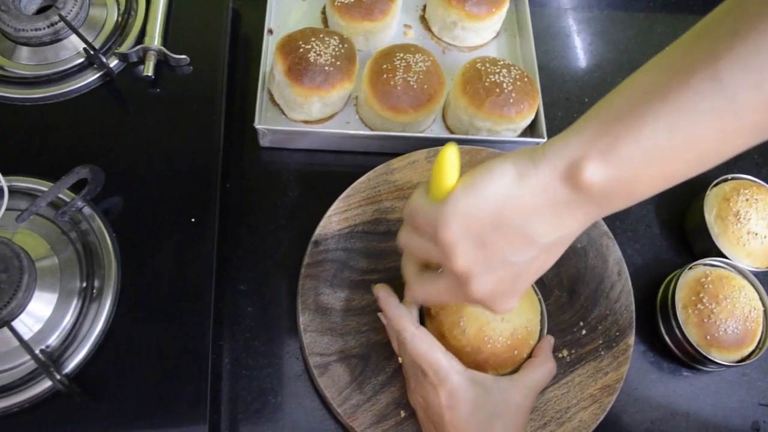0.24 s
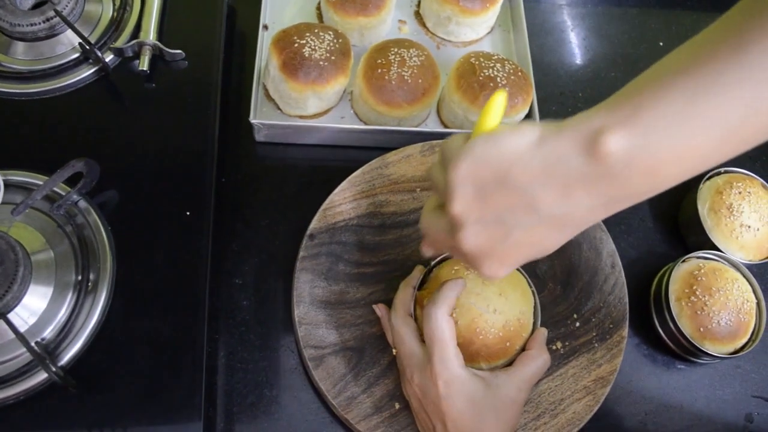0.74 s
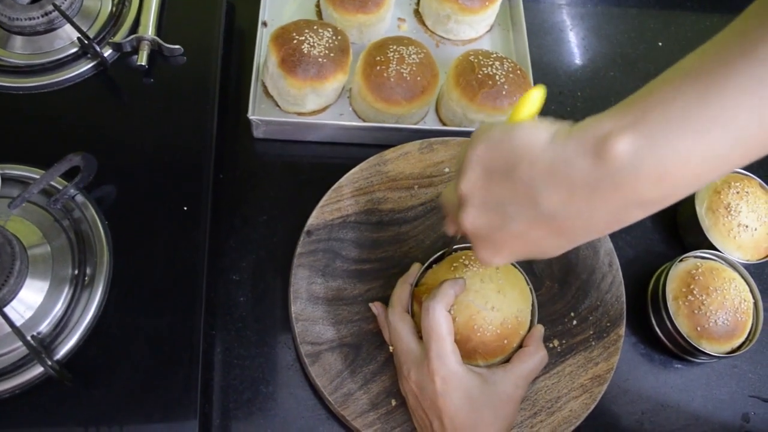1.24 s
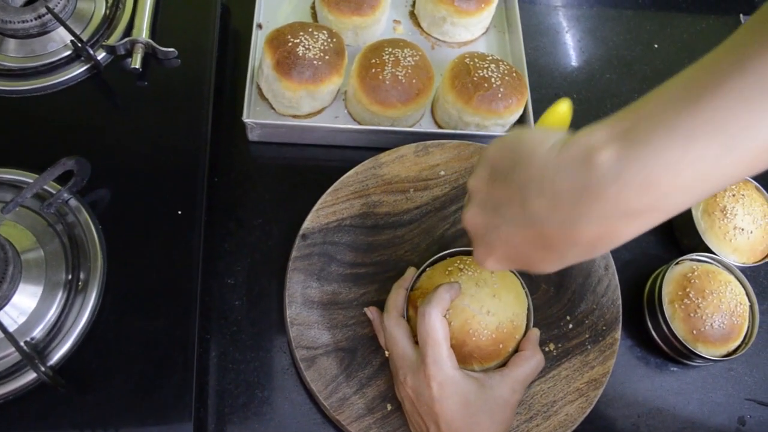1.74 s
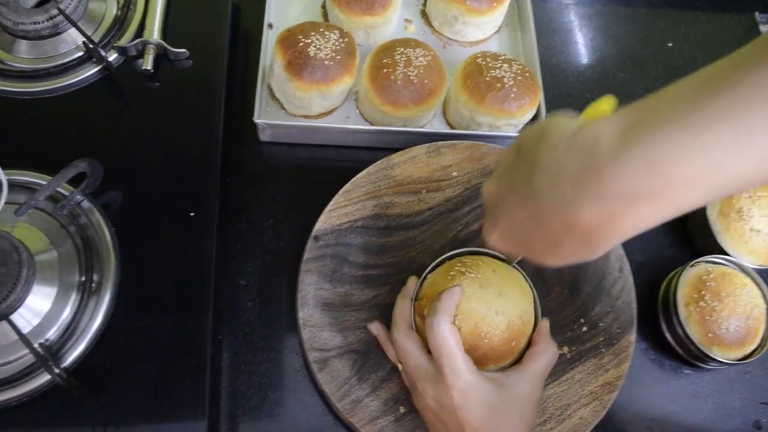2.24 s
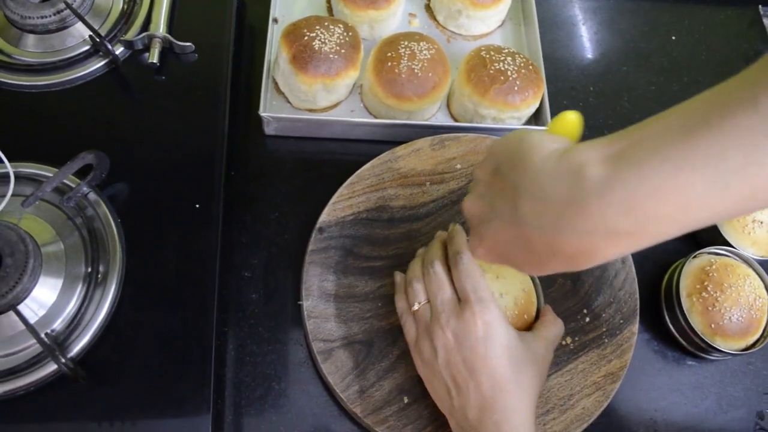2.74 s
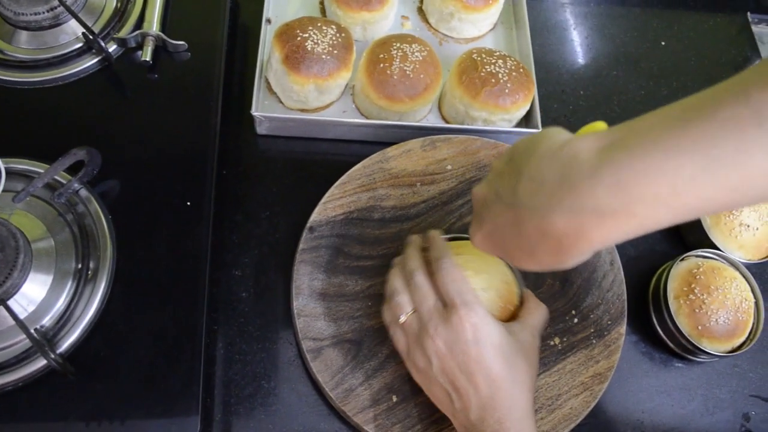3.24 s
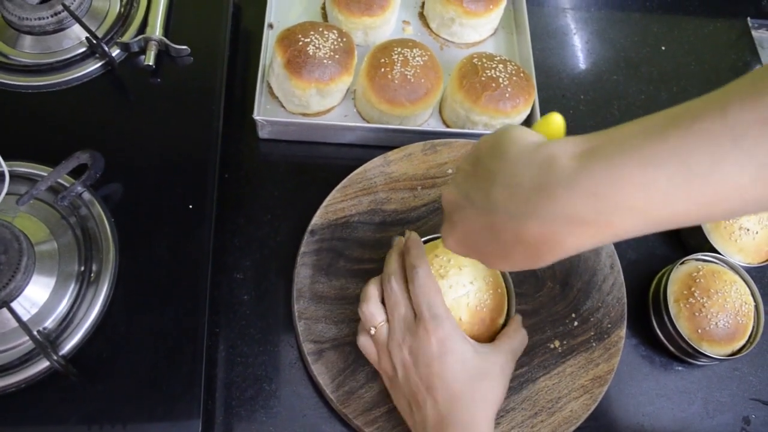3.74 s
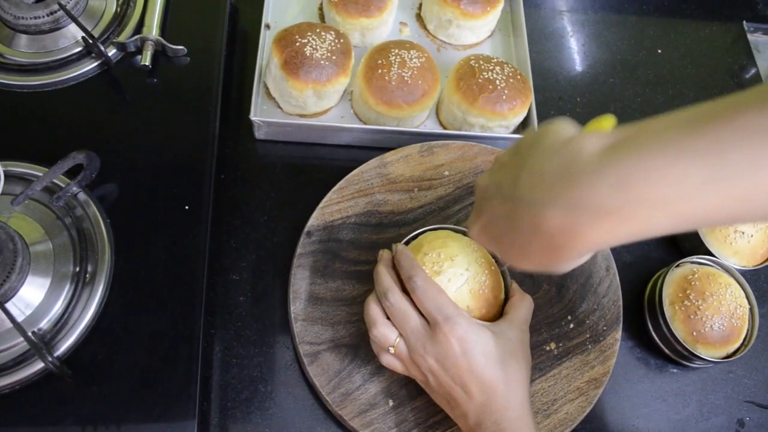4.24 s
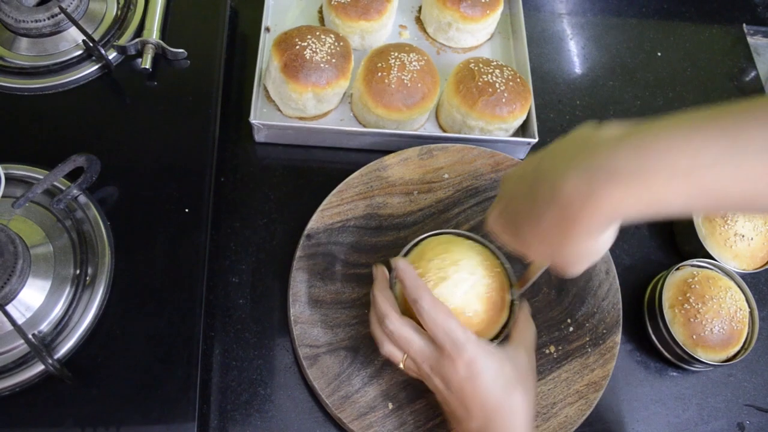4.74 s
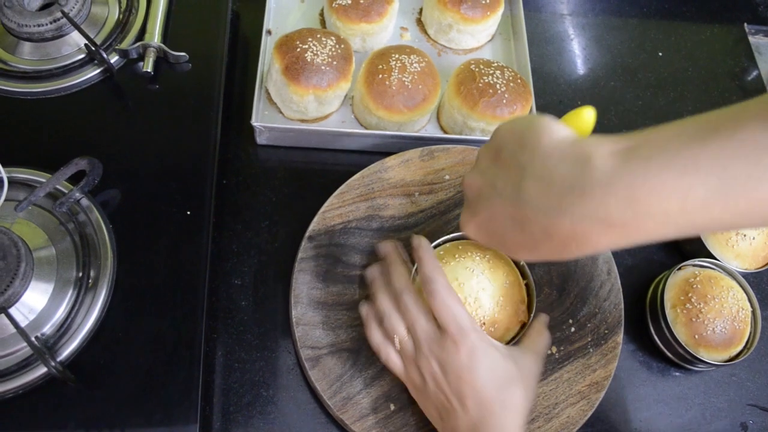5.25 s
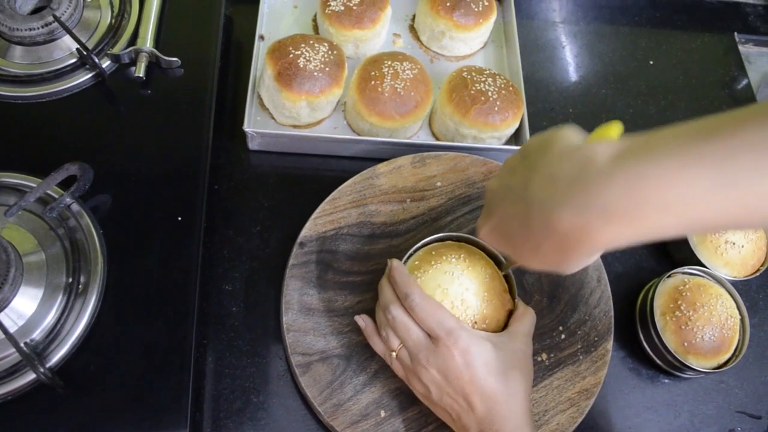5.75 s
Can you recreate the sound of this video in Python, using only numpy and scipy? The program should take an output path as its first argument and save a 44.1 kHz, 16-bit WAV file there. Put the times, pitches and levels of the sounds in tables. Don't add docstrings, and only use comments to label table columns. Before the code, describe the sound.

Small metal tin worked with a knife: soft scratchy sawing first, uneven and quickening into firmer knocks, a short lull, then abrupt scraping stabs each stopped by a bright, hollow tin-and-wood knock. Recorded near the action in a hard, live kitchen with a short ring and quiet low background noise; the top treble is cut off.

```python
import sys
import numpy as np
from scipy import signal
from scipy.fft import rfft, irfft, next_fast_len
from scipy.io import wavfile
from scipy.ndimage import uniform_filter1d, map_coordinates

SR = 44100
rng = np.random.default_rng(int(sys.argv[2]) if len(sys.argv) > 2 else 0)


def unload_audio(sound):
    columns = np.transpose(np.atleast_2d(sound))
    steps = np.round(np.clip(columns, -1, 1) * 32767)
    wavfile.write(sys.argv[1], SR, steps.astype(np.int16))


def gain_from_db(level_db):
    decades = np.asarray(level_db, float) / 20
    return 10 ** decades


N = 264159

# start in seconds, peak in dB, upper resonance in dB, steel clink in dB.
KNOCKS = [(0.25, -68, 14, -15), (0.372, -66, 14, -20), (0.399, -65, 17, -20), (0.836, -35, 2.5, -1),
          (1.139, -42, 1.5, -31), (1.121, -46, -4, -27), (1.159, -35.5, -10, -22), (1.166, -41.5, -5, -22),
          (1.178, -45, 5, -21), (1.316, -53, -7, -15.5), (1.426, -53, -17, -16), (1.449, -44, -2, -31),
          (1.457, -39, -10, -22), (1.474, -47.5, -7, -28), (1.488, -23.5, -3.5, -19.5),
          (1.494, -36, -3.5, -18), (1.741, -45, 5, -35), (1.727, -58, 10, -32), (1.751, -45.5, 14, -30),
          (1.759, -39, 2.5, -36), (1.768, -37, -0.5, -32), (1.786, -33, 3, -8.5), (1.803, -46.5, 13.5, -14),
          (1.81, -42, 8, -13), (1.827, -49, -5, -14), (1.858, -75, -6, -13), (2.052, -57.5, 16.5, -21),
          (2.074, -49, 12.5, -27), (2.087, -44, 12, -26), (2.102, -30, -5, -32), (2.115, -26.5, -18, -30),
          (2.1305, -33, 1, -13), (2.124, -21, -6, -16.5), (2.413, -50.5, 3, -33), (2.423, -57, 13, -33),
          (2.436, -58.5, 13.5, -23), (2.458, -48, -5.5, -30), (3.168, -50, 4.5, -26.5),
          (3.2, -37, 0.5, -20), (3.2283, -10.5, -1, -8), (3.448, -44.5, -6.5, -10.5),
          (3.517, -16.5, -2.5, -14.5), (4.0475, -20, 1, -15), (4.286, -55.5, 4, -15), (4.305, -55, 3, -14),
          (4.354, -18, -1, -7.5), (4.658, -18.5, -3.5, -14.5), (4.801, -57.5, 6, -10),
          (5.645, -48, 11.5, -27.5), (5.654, -47, 7.5, -42), (5.745, -63, 8, -8), (5.882, -48.5, -18, -23),
          (5.929, -27, 0, -9), (5.969, -57, -11, -12)]
# start in seconds, then rim clang, room boom, blade tick and
# worktop thud, all in dB.
LANDINGS = [
    (0.837, -47, -69, -54.5, -47),
    (1.488, -54, -69, -68, -72),
    (2.124, -61, -63.5, -62.5, -37.5),
    (3.2271, -27, -56, -46.5, -35.5),
    (3.5159, -39.5, -63, -46, -47.5),
    (4.046, -65, -69, -55, -49),
    (4.352, -48, -62, -59, -45.5),
    (4.656, -40.5, -57.5, -78, -72),
    (5.6409, -64, -81, -75, -48.5),
    (5.9296, -40.5, -54.5, -48, -34.5),
]
# time in seconds, share from 0 to 1.
CUSHION = [(0, 0.97), (2.6, 0.97), (3.1, 0.7), (3.4, 0.7), (3.49, 0.8), (4.05, 0.75), (4.35, 0.28),
           (4.66, 0.54), (5.9, 1)]
# centre in Hz, width in Hz, level in dB.
HOLLOW = [(555.7, 50, -12), (698.5, 43, -0.5), (734, 83, 2), (1040, 87, -13)]
# centre in Hz, width in Hz, level in dB.
UPPER = [(1094, 70, -15.5), (1248, 110, 0.5), (1335, 170, -4.5), (1460, 80, -9.5)]
# centre in Hz, width in Hz, level in dB.
STEEL = [(1630, 120, 2), (1760, 130, 2.5), (1830, 70, -2.5), (2030, 110, -9)]
# centre in Hz, width in Hz, level in dB.
WORKTOP = [(300, 49, 1.2), (370, 180, 9.5), (500, 170, 9.7)]
# frequency in Hz, level in dB per Hz.
EDGE = [(5500, -42), (7000, -8), (8000, 4), (9000, 2.5), (10300, 8), (11200, 0.5), (12200, -1.5),
        (13500, -17), (15500, -33.5), (16000, -63)]
# frequency in Hz, level in dB per Hz.
FLANK = [(3000, -48.5), (4200, 0), (5000, -4.5), (6000, -5.5), (7000, -6), (8500, -23)]


def knocks():
    s, db, upper_db, steel_db = np.transpose(KNOCKS)
    land, _, _, land_tick_db, land_thud_db = np.transpose(LANDINGS)
    start = s - .0017
    both = np.r_[s, land]

    soft = np.clip(curves(CUSHION)[0], 0, 1)
    low = blows(start, db + 38, chatter=.03, t60=.012)
    low = soft * filtered(low, body([(715, 180, 1.5)], 110, 6700)) + (1 - soft) * low
    high = blows(start, db + upper_db + 38, chatter=.03, t60=.012)
    cushioned = filtered(high, body([(1294, 140, 3.53)], 100, 5000))
    bare = filtered(high, body([(1350, 1200, 0.92)], 100, 5000))
    high = soft * cushioned + (1 - soft) * bare
    tin = -filtered(low, body(HOLLOW, 450, 1050)) - filtered(high, body(UPPER, 800, 1600))

    clink = blows(start, db + steel_db + 24, chatter=0.33, t60=0.031)
    tin += filtered(clink, body(STEEL, 1200, 2300))

    thud_db = np.r_[-56 + 0.16 * db, land_thud_db]
    thud = blows(both, thud_db + 22.5, chatter=0.11, t60=0.087)
    tin += filtered(thud, body(WORKTOP, 310, 510))
    tick_db = np.r_[-65.5 + 0.22 * db, land_tick_db]
    tick = bursts(np.transpose([both, tick_db, 0.013 + 0 * both]))
    return tin + shaped(tick, EDGE) + gain_from_db(11.0) * shaped(tick, FLANK)


# centre in Hz, width in Hz, level in dB.
RIM = [(2166, 200, 1.5), (2220, 210, 4), (2605, 93, -9), (2700, 120, -8), (3070, 58, -9)]


def landings():
    s, rim_db, boom_db, tick_db, _ = np.transpose(LANDINGS)

    def rim_response(f):
        steep = 1 / (1 - (f / 3050) ** 2 + .5j * f / 3050) ** 4
        return steep * (.15 + .85 / (1 + (f / 3130) ** 30)) * body(RIM, 1900, 3600)(f)

    def room_mode(f):
        return body([(122, 12, 0)], 60, 300)(f) ** 2

    rattle = bursts(np.transpose([s, rim_db - 29.0, 0.35 + 0 * s]))
    clang = blows(s + .0006, rim_db - 0.5, chatter=0.39, t60=0.01)
    rim = filtered(clang + rattle, rim_response)
    sizzle = bursts(np.transpose([s, rim_db - 28, 0.37 + 0 * s]))
    rim += shaped(sizzle, [(2900, -28.0), (3500, 2.5), (5200, 3.5), (7500, -24.0)])
    slap = bursts(np.transpose([s, tick_db - 7.0, 0.22 + 0 * s]))
    rim += shaped(slap, FLANK)
    rim += gain_from_db(7.5) * filtered(rattle, body([(1520, 200, 6), (1750, 200, 4)], 1100, 2300))
    boom = blows(s + 0.0044, boom_db + 61.0, chatter=.01, t60=.01)
    return rim + filtered(boom, room_mode)


# start in seconds, length in seconds, level at the end in dB,
# upper resonance in dB, swell in dB.
DRAG = [(0.01, 0.12, -61.5, 11, 8), (0.145, 0.074, -73, 9.5, 6), (0.221, 0.18, -66, 14, 4.5),
        (0.732, 0.092, -51, 2, 40), (1.06, 0.096, -43.5, 1.5, 35), (1.327, 0.019, -59, -7, 2),
        (1.389, 0.08, -45.5, 4.5, 33), (1.608, 0.15, -64, -1, 14), (1.7, 0.055, -47.5, 8, 26),
        (1.759, 0.032, -41.5, -3, -0.5), (1.952, 0.066, -61, 5, 4), (2.019, 0.091, -35.5, -1, 36.5),
        (2.42, 0.018, -68.5, 13.5, 20), (2.477, 0.011, -63, -18, -5), (3.163, 0.056, -36.5, 0, 22),
        (3.475, 0.055, -54.5, 7.5, 8.5), (3.989, 0.1, -46, -0.5, 17.5), (4.273, 0.072, -40.5, 0.5, 26),
        (4.555, 0.13, -40.5, 2.5, 26), (5.537, 0.044, -64, 6, 8), (5.631, 0.0089, -50, 3.5, 6),
        (5.763, 0.021, -81.5, 18, -7), (5.865, 0.051, -47.5, 6.5, 27)]


def drag():
    s, length, db, upper_db, swell_db = np.transpose(DRAG)
    off_db_per_s = 695.5
    low = strokes(s, length, db - 0.5, swell_db, off_db_per_s)
    high = strokes(s, length, db + upper_db - 3.0, swell_db, off_db_per_s)
    force = grit(rate=1700, spread_db=0.0) * gain_from_db(1.6 * wobble(48))
    hollow = unit(filtered(force, body(HOLLOW, 540, 1500)))
    upper = unit(filtered(force, body(UPPER, 470, 2100)))
    return low * hollow + high * upper


# start in seconds, length in seconds, edge hiss in dB,
# flank hiss in dB over the edge, wall rasp in dB.
SAWING = [(0.005, 0.096, -71.5, 13.5, -53), (0.176, 0.012, -100, 6, -65.5), (0.232, 0.04, -73.5, 9, -58),
          (0.287, 0.1, -77, 9, -57.5), (0.565, .012, -86.5, 11.5, -76.5), (0.757, 0.085, -70.5, -6, -61),
          (1.004, 0.033, -77, -2, -66.5), (1.085, 0.071, -65, 4.5, -51), (1.315, 0.011, -60.5, -1.5, -57.5),
          (1.42, 0.043, -60.5, -4.5, -58), (1.596, 0.061, -63, 0, -59), (1.701, 0.09, -61, -0.5, -53.5),
          (1.922, 0.068, -65.5, -12, -61), (2.064, 0.054, -62, -4, -61), (2.263, 0.023, -77.5, 7, -74.5),
          (2.37, 0.057, -78.5, -15, -73)]
# start in seconds, length in seconds,
# edge hiss in dB, flank hiss in dB over the edge, wall rasp in dB.
PLUNGES = [(2.99, 0.084, -83.5, -17, -81.5), (3.171, 0.034, -58.5, -23, -77),
           (3.335, 0.023, -74, -8.5, -81), (3.452, 0.071, -65.5, -1, -65), (3.916, 0.019, -76, -12, -75),
           (4.282, 0.052, -62, -1, -60.5), (4.468, 0.0095, -93, -15, -72),
           (4.509, 0.049, -65.5, 5.5, -62.5), (4.586, 0.053, -65.5, 6, -63), (4.774, 0.036, -67.5, -4, -66),
           (4.977, 0.15, -90, 7, -83), (5.526, 0.022, -58.5, -2.5, -65.5), (5.623, 0.01, -66, -2, -70),
           (5.744, 0.046, -64.5, 2.5, -65), (5.883, 0.054, -60.5, -11, -53), (5.923, 0.079, -70, -14, -69)]
# start in seconds, peak in dB, t60 in seconds.
CATCHES = [(0.245, -78, 0.26), (0.5844, -77, 0.13), (0.765, -57.5, 0.35), (0.9921, -70, 0.11),
           (1.604, -47, 0.23), (1.9365, -59, 0.19), (2.2795, -84, 0.12), (3.9234, -58.5, 0.077),
           (4.4756, -60, 0.11), (4.511, -57, 0.08), (4.766, -68, 0.11), (5.5362, -48, 0.21),
           (5.632, -62, 0.1), (5.745, -67, 0.1)]
# time in seconds, frequency in Hz.
CONTACT = [(0, 2670), (0.26, 2250), (0.33, 3500), (0.42, 3300), (0.78, 3170), (1.03, 3090), (1.13, 2670),
           (1.33, 2520), (1.45, 3090), (1.66, 3090), (1.78, 2480), (1.96, 2600), (2.1, 2380), (2.42, 3030),
           (3, 2184), (5.99, 2170)]
# centre in Hz, width in Hz, level in dB.
WALL = [(2243, 290, -3), (2490, 85, -4), (2690, 200, -2), (3090, 260, -4.5), (3540, 220, -12.5),
        (4070, 87, -18)]


def slide():
    s, length, hiss_db, flank_db, rasp_db = np.transpose(SAWING + PLUNGES)
    swell_db = np.repeat([10, 14], [len(SAWING), len(PLUNGES)])

    def press(db, more=1):
        return strokes(s, length, db, more * swell_db, off_db_per_s=446.5)

    force = grit(rate=9000, spread_db=0.0) * gain_from_db(1.8 * wobble(60))
    force = patchy(force, depth_db=4, bins=8, frames=10)
    hiss = press(hiss_db - 1.5) * unit(shaped(force, EDGE))
    hiss += press(hiss_db + flank_db - 7.5) * unit(shaped(force, FLANK))

    bites = bursts(CATCHES)
    bite = gain_from_db(-12.0) * shaped(bites, EDGE) + gain_from_db(-9.5) * shaped(bites, FLANK)

    centre_hz = curves(CONTACT)[0]
    rub = grit(rate=3500, spread_db=-5.0) * gain_from_db(1.8 * wobble(50))
    rub = filtered(rub, body([(2800, 20000, 0)], 990, 4900))
    rasp = np.zeros(N)
    for hz, width, db in WALL:
        octaves_off = abs(np.log2(hz / centre_hz))
        lean = gain_from_db(-10 * np.minimum(octaves_off / .14, 1.3))
        rasp += lean * gain_from_db(db) * note(rub, hz, width, order=1)
    rasp = rasp / np.sqrt(np.abs(uniform_filter1d(rasp ** 2, size=6000)) + 1e-20)
    return hiss + bite + press(rasp_db - .3, more=0.94) * rasp


# start in seconds, length in seconds,
# level in dB, pitch in Hz, width in Hz.
SINGING = [(0.016, 0.09, -57, 2800, 420), (0.023, .07, -76, 4030, 700), (0.243, 0.058, -59, 2030, 200),
           (0.308, 0.015, -65, 4230, 250), (0.309, 0.028, -59, 3220, 200), (0.302, 0.036, -58.5, 3630, 600),
           (0.32, 0.036, -55, 1990, 252), (0.762, 0.042, -66, 3050, 250), (1.447, 0.033, -67, 3070, 250),
           (1.61, 0.052, -67.5, 5500, 700), (1.628, 0.049, -56.5, 3100, 220),
           (1.63, 0.039, -65.5, 2430, 200), (1.71, .08, -65, 2500, 300), (1.938, 0.041, -54, 2580, 550),
           (1.948, 0.057, -73, 5200, 700), (3.198, 0.049, -56.5, 2690, 903),
           (4.308, 0.043, -66.5, 3400, 499), (4.54, 0.026, -66, 4460, 900),
           (4.545, 0.018, -66.5, 2130, 200), (4.663, .012, -39.5, 1870, 150), (4.68, 0.028, -50, 1600, 250),
           (3.3, 0.081, -55.5, 1803, 507), (5.742, 0.027, -59, 1350, 250)]


def singing():
    force = grit(rate=4000, spread_db=1.0) * gain_from_db(1.4 * wobble(60))
    out = np.zeros(N)
    for s, length, db, hz, width in SINGING:
        gain = strokes(s, length, db, swell_db=4.5, off_db_per_s=498)
        out += gain * unit(note(force, hz, width, order=2))
    return out


# start in seconds,
# length in seconds, level in dB, pitch in Hz.
ROCKING = [
    (3.216, 0.079, -61, 500),
    (3.515, 0.026, -41.5, 474),
    (3.55, 0.037, -47, 519.5),
    (2.132, 0.034, -50, 498),
    (5.642, 0.01, -51, 1020),
    (5.895, .03, -55.5, 460),
    (5.93, 0.011, -38, 546),
]


def rocking():
    force = grit(rate=5000, spread_db=2.5)
    out = np.zeros(N)
    for s, length, db, hz in ROCKING:
        gain = strokes(s, length, db, swell_db=-4.0, off_db_per_s=401.5)
        out += gain * unit(note(force, hz, width=170, order=2))
    return out


# start in seconds, end in seconds, pitch in Hz, level in dB.
SQUEAK = (3.62, 3.86, 6900, -92)


def squeak():
    start, end, hz, db = SQUEAK
    t = np.arange(N) / SR
    gate = np.clip(np.minimum(t - start, end - t) / 0.028, 0, 1)
    phase = 2 * np.pi * np.cumsum(hz + 15 * wobble(40)) / SR
    return gain_from_db(db + 3.7 * wobble(29.6)) * gate * np.sin(phase)


# delay in ms, level in dB.
HOLLOW_ECHOES = [(16.73, -9.4), (26.49, -15.6), (38.07, -16.4), (45.17, -19.5), (54.26, -22.1),
                 (58.03, -14.2), (66.01, -22.2), (72.9, -17.6), (79.37, -29.4), (86.83, -21.9),
                 (93.13, -29.0), (97.03, -33.2), (100.98, -23.8), (103.4, -32.2), (105.83, -28.4),
                 (109.46, -30.4), (114.47, -24.5), (126.67, -31.0), (134.78, -34.9), (141.75, -26.9),
                 (148.44, -35.2), (153.27, -43.7), (157.91, -35.6), (164.78, -36.5)]
# delay in ms, level in dB.
UPPER_ECHOES = [(8.05, -8.7), (17.32, -17.5), (22.11, -17.6), (25.56, -18.5), (30.23, -15.8),
                (37.76, -18.2), (42.83, -24.8), (45.31, -20.1), (51.09, -24.8), (54.31, -21.1),
                (56.78, -26.8), (60.05, -21.6), (65.58, -17.6), (71.95, -19.9), (76.01, -27.3),
                (87.3, -31.7), (92.7, -32.5), (99.68, -30.6), (110.68, -29.2), (114.04, -32.4),
                (118.87, -35.6), (127.07, -36.4), (136.08, -32.6), (138.75, -37.1), (143.04, -35.3),
                (146.42, -35.0), (149.02, -40.6), (154.49, -39.9), (157.48, -39.5), (160.93, -42.5)]
# frequency in Hz, level in dB.
HOLLOW_BAND = [(400, -60), (540, 0), (900, 0), (1000, -60)]
# frequency in Hz, level in dB.
UPPER_BAND = [(920, -60), (1020, 0), (1480, 0), (1650, -60)]


def walls(x):
    hollow = gain_from_db(-0.93) * echoes(x, HOLLOW_BAND, HOLLOW_ECHOES)
    return hollow + gain_from_db(-2.2) * echoes(x, UPPER_BAND, UPPER_ECHOES)


# frequency in Hz, t60 in seconds.
KITCHEN = [(100, 0.25), (700, 0.39), (1300, .37), (2000, 0.35), (3000, 0.24), (4200, 0.03), (12000, 0.26)]
# frequency in Hz,
# level in dB.
SIDEWAYS = [(400, 0), (720, 0), (950, 10), (1250, -3.5), (1600, 3.5), (2000, -2), (2600, -3), (3300, -1.5)]
# frequency in Hz,
# level until then in dB.
UNFORMED = [(480, -1.5), (600, -12.5), (850, -9), (960, 0.5), (1100, -5), (1400, -8), (1600, -1)]


def kitchen(x):
    wet, step = np.zeros(N + 2 * SR), round(0.3 * SR)
    for start in range(0, N, step):
        hz, t, z = signal.stft(rng.standard_normal(SR // 2), SR, nperseg=256)
        z = z / np.sqrt(abs(z) + 1e-9)
        colour_db = along(SIDEWAYS, hz)[:, None]
        decay_db = 60 * t / along(KITCHEN, hz)[:, None]
        tail = signal.istft(z * gain_from_db(colour_db - decay_db), SR, nperseg=256)[1]
        age = np.arange(len(tail)) / SR
        tail = tail * (1 - np.exp(-age / 0.00085))
        tail = tail * gain_from_db(60 * np.minimum(age, .07))
        tail = tail * gain_from_db(-7 * np.clip((age - .07) / 0.018, 0, 1))
        late = gain_from_db(along(UNFORMED, hz)[:, None] * (t < .165))
        z = signal.stft(tail / np.linalg.norm(tail), nperseg=256)[2][:, :len(t)]
        tail = signal.istft(z * late, nperseg=256)[1]
        answer = signal.fftconvolve(x[start:start + step], tail)
        wet[start + 250:][:len(answer)] += answer
    return wet[:N]


# frequency in Hz, level in dB per Hz.
RUMBLE = [(15, -23), (25, -13), (50, -2.5), (100, -2), (200, 4.5), (400, 5), (800, 0.5), (1300, -3),
          (2000, -10.5), (3200, -18.5), (5000, -29), (8000, -35), (11500, -37), (13000, -56)]
# time in seconds, level in dB.
RUMBLE_DB = [(0.0, -67.5), (3.62, -67.5), (3.74, -70.5), (4.04, -67), (4.22, -66.5), (4.74, -67),
             (5.15, -65.5), (5.55, -67.5), (5.99, -63)]
# time in seconds, level in dB, pitch in Hz.
HUM = [(0, -77.5, 122), (1, -78.5, 125), (1.5, -69.5, 132), (2.2, -71.5, 120), (2.7, -81.5, 122),
       (3.1, -83.5, 121), (5.99, -82, 121)]


def rumble():
    air = patchy(rng.standard_normal(N), depth_db=1.8, bins=4, frames=10)
    air = gain_from_db(curves(RUMBLE_DB)[0] + 3.0) * unit(shaped(air, RUMBLE))
    hum_db, hum_hz = curves(HUM)
    drone = np.sin(2 * np.pi * np.cumsum(hum_hz + 4 * wobble(9)) / SR)
    return air + gain_from_db(hum_db + 4.4 * wobble(12)) * drone


def blows(s, db, chatter, t60):
    t, force = np.arange(400), np.zeros(N + 400)
    shape = chatter * rng.standard_normal((len(s), 400)) * gain_from_db(-60 * t / SR / t60)
    shape = shape + (t == 0)
    np.add.at(force, np.round(s * SR).astype(int)[:, None] + t, gain_from_db(db)[:, None] * shape)
    return force[:N]


def strokes(s, length, db, swell_db, off_db_per_s):
    out, span = np.zeros(N + SR), np.arange(-SR // 20, SR // 2) / SR
    bite_db = np.minimum(2504.5 * span, 0)
    for at, long, top_db, swell in np.broadcast(s, np.maximum(length, .003), db, swell_db):
        to_go = 1 - np.clip(span / long, 0, 1)
        swell_now_db = swell * to_go ** 1.2
        off_db = off_db_per_s * np.maximum(span - long, 0)
        out[round(at * SR):][:len(span)] += gain_from_db(top_db + bite_db - swell_now_db - off_db)
    return out[SR // 20:][:N]


def grit(rate, spread_db):
    slips = rng.random(N) < rate / SR
    return unit(slips * rng.standard_normal(N) * gain_from_db(spread_db * rng.exponential(size=N)))


def bursts(rows):
    out, t = np.zeros(N + SR), np.arange(SR // 5) / SR
    for s, db, t60 in rows:
        out[round(s * SR):][:len(t)] += gain_from_db(db - 60 * t / max(t60, .004)) * rng.standard_normal(len(t))
    return out[:N]


def body(modes, small_hz, soft_hz):
    def bend(u):
        return 1 - u * u + 1.2j * u

    def response(f):
        ring = sum(gain_from_db(db) * 1j * f * w / (c * c - f * f + 1j * f * w) for c, w, db in modes)
        radiated = np.square(np.square(f / small_hz) / bend(f / small_hz))
        contact = bend(f / soft_hz)
        return ring * radiated / (contact * contact * contact)

    return response


def note(x, hz, width, order):
    for _ in range(order):
        x = signal.lfilter(*signal.iirpeak(hz, hz / max(width, 30), fs=SR), x)
    return x


def echoes(x, band, paths):
    ms, db = np.transpose(paths)
    taps = np.zeros(SR // 5)
    taps[np.round(ms * SR / 1000).astype(int)] = gain_from_db(db)
    return signal.fftconvolve(shaped(x, band), taps)[:N]


def filtered(x, response):
    m = next_fast_len(N + SR // 2)
    return irfft(rfft(x, m) * response(np.fft.rfftfreq(m, 1 / SR)), m)[:N]


def shaped(x, spectrum):
    return filtered(x, lambda hz: gain_from_db(along(spectrum, hz)))


def patchy(x, depth_db, bins, frames):
    z = signal.stft(x, nperseg=512)[2]
    field = uniform_filter1d(rng.standard_normal(z.shape), size=bins, axis=0)
    field = uniform_filter1d(field, size=frames, axis=1)
    return signal.istft(z * gain_from_db(depth_db * unit(field)), nperseg=512)[1][:N]


def wobble(rate):
    knots = rng.standard_normal(int(N * rate / SR) + 4)
    return map_coordinates(knots, [np.arange(N) * rate / SR])


def curves(rows):
    s, *cols = np.transpose(rows)
    return [np.interp(np.arange(N) / SR, s, c) for c in cols]


def along(points, hz):
    f, v = np.transpose(points)
    return np.interp(np.log(hz + 1), np.log(f + 1), v)


def unit(x):
    return x / np.sqrt(np.mean(x ** 2) + 1e-20)


def scene():
    tin = knocks() + landings() + drag() + slide() + singing() + rocking()
    room = walls(tin) + gain_from_db(-6.5) * kitchen(tin)
    return (tin + room + squeak() + rumble())[None]


def roll_off(x):
    return signal.sosfilt(signal.butter(12, 15700, fs=SR, output="sos"), x)


def record(dry):
    faint_hz, faint_db = 11800, -125
    hz, _, z = signal.stft(dry, SR, nperseg=2048)
    hz = hz[:, None]
    heard = uniform_filter1d(abs(z) ** 2, size=24, axis=1) > gain_from_db(2 * faint_db)
    z = z * ((heard | (hz < faint_hz)) & (hz < 15700))
    mix = signal.istft(z, SR, nperseg=2048)[1][:, :N]
    return roll_off(mix)


dry = scene()
out = record(dry)
unload_audio(out)
```